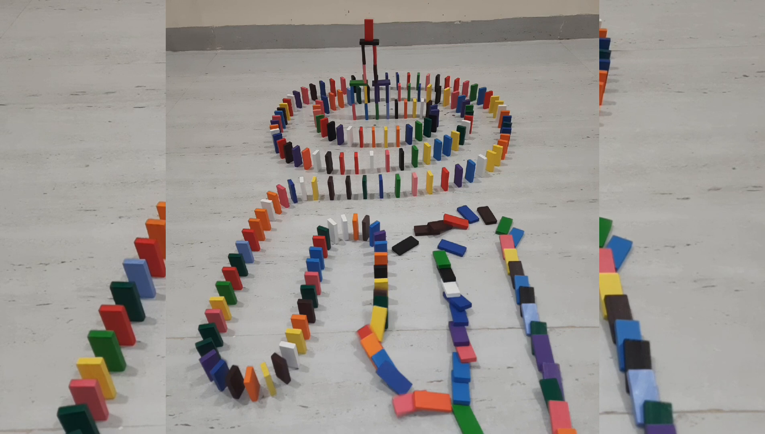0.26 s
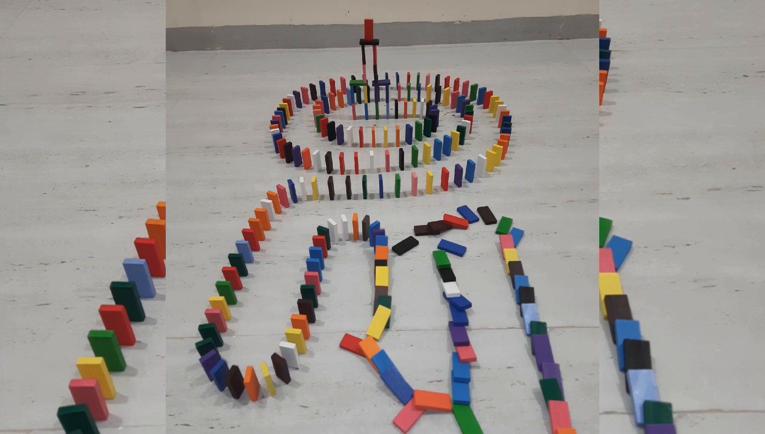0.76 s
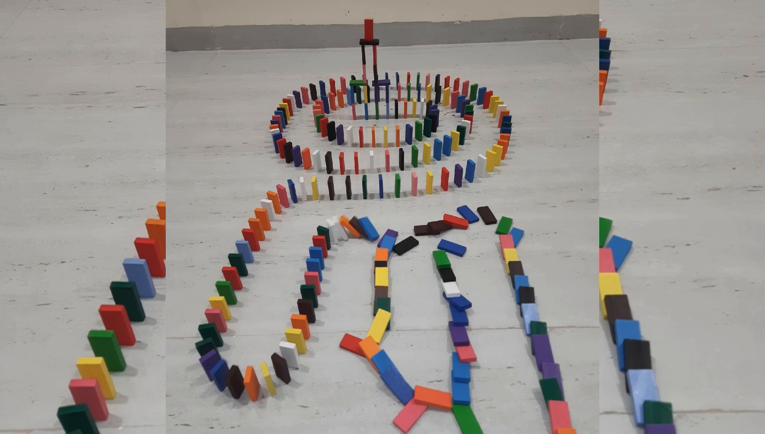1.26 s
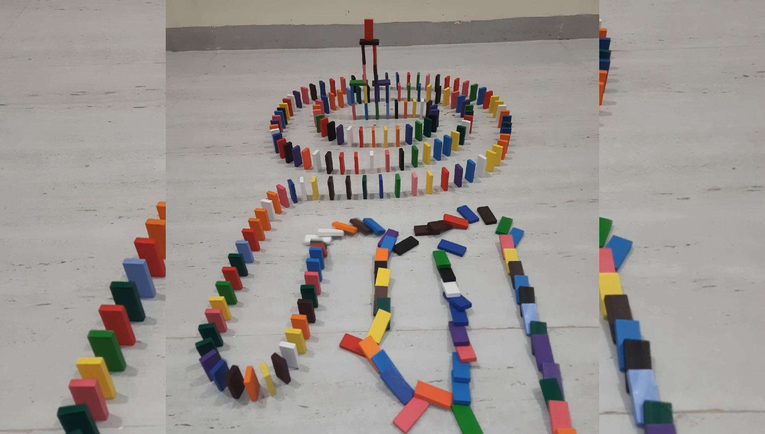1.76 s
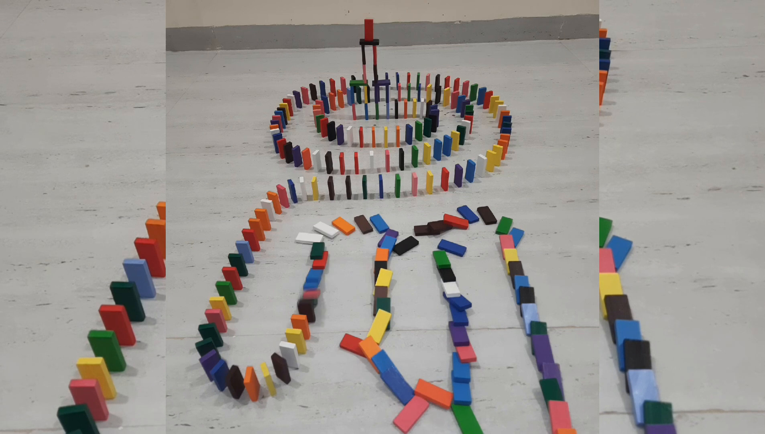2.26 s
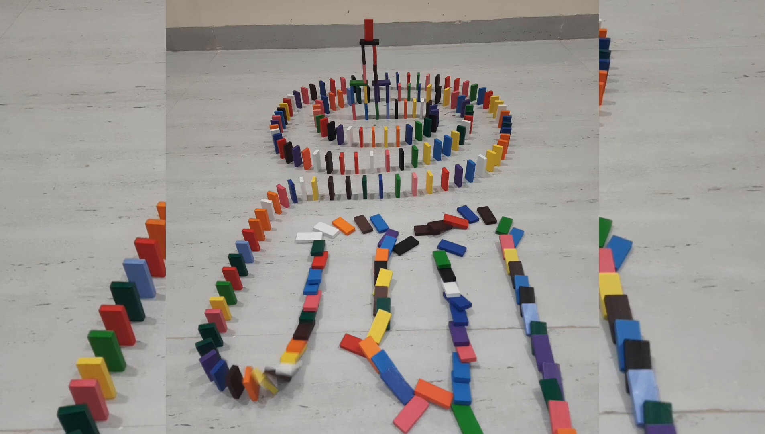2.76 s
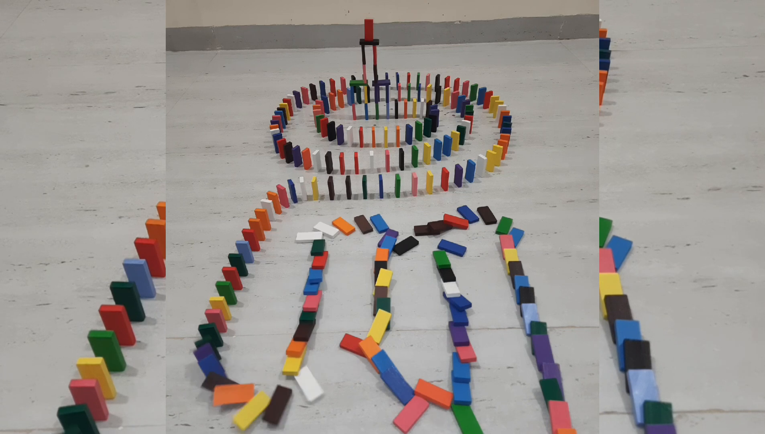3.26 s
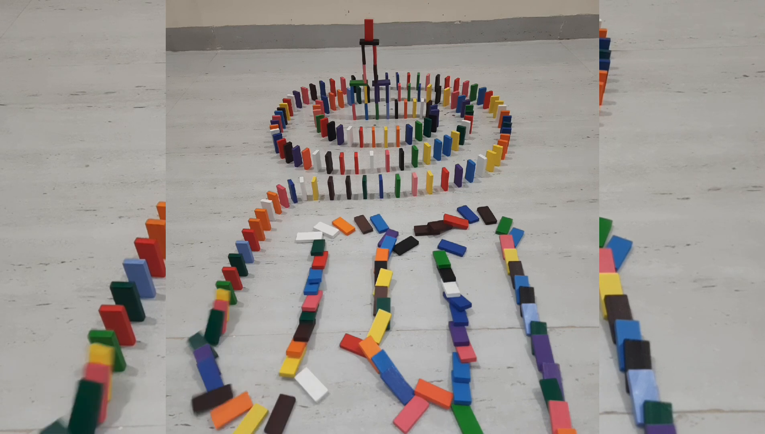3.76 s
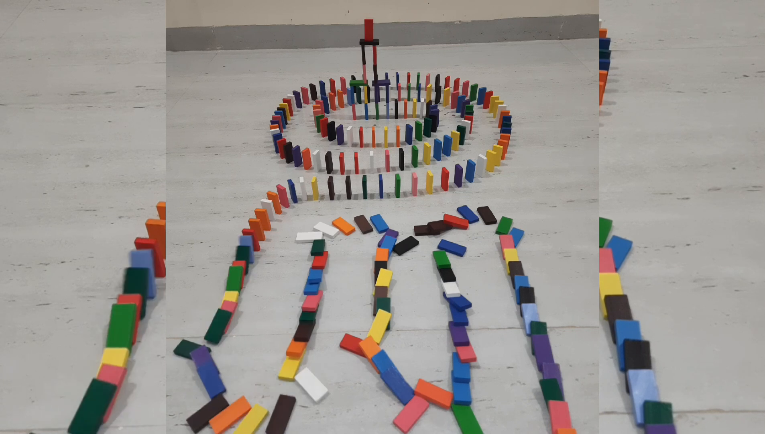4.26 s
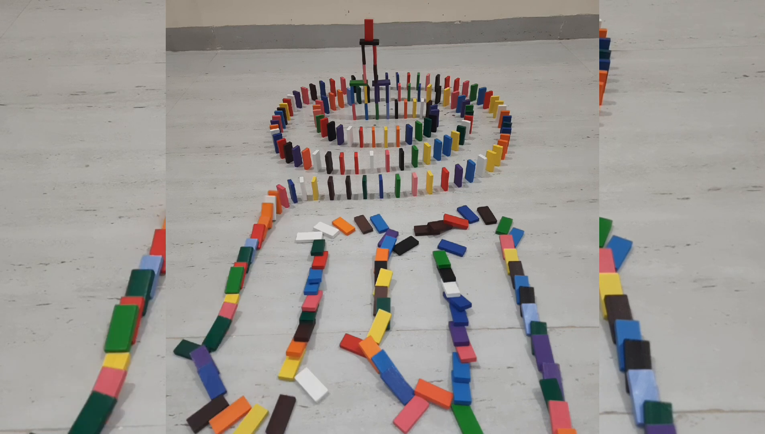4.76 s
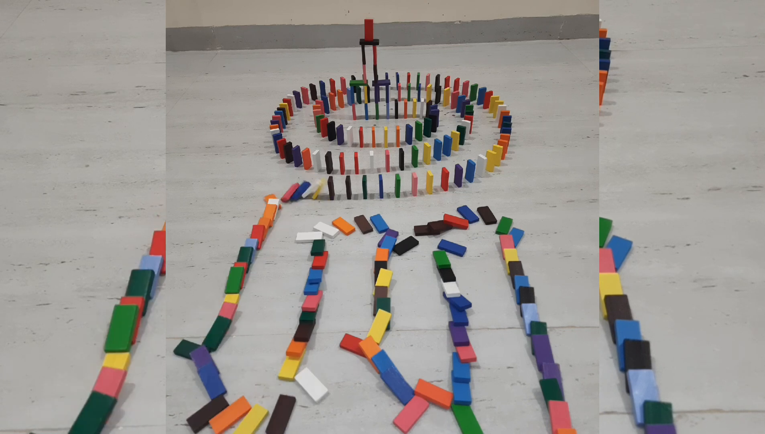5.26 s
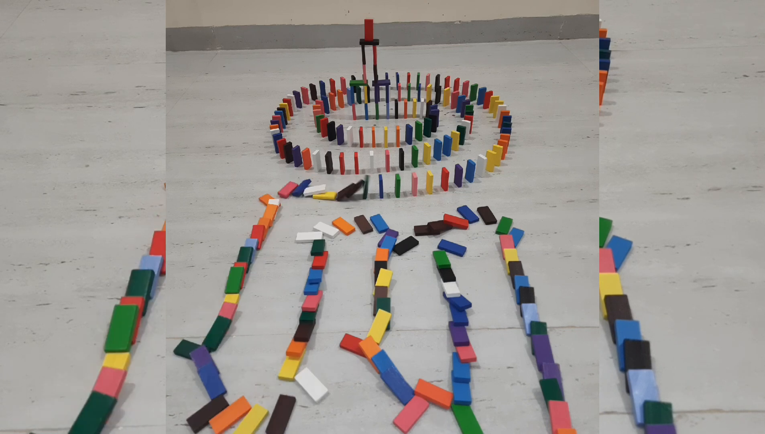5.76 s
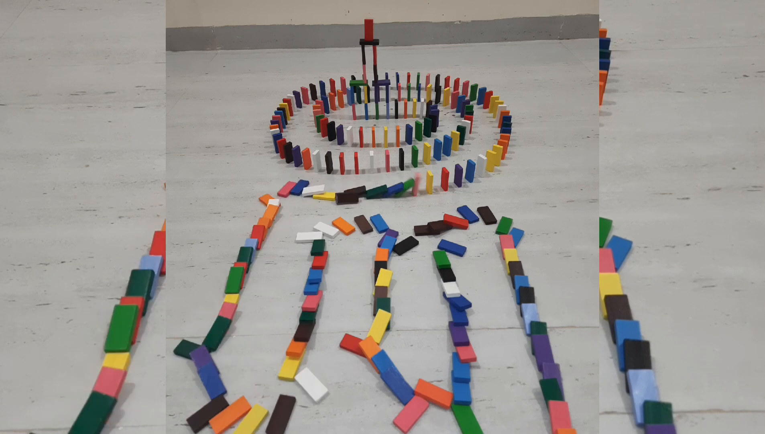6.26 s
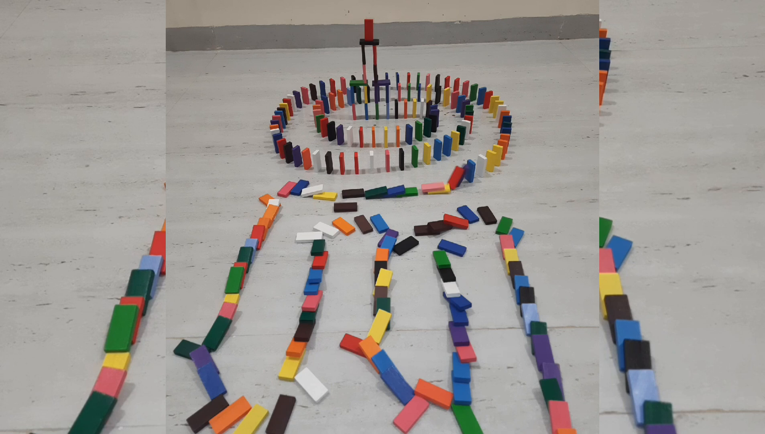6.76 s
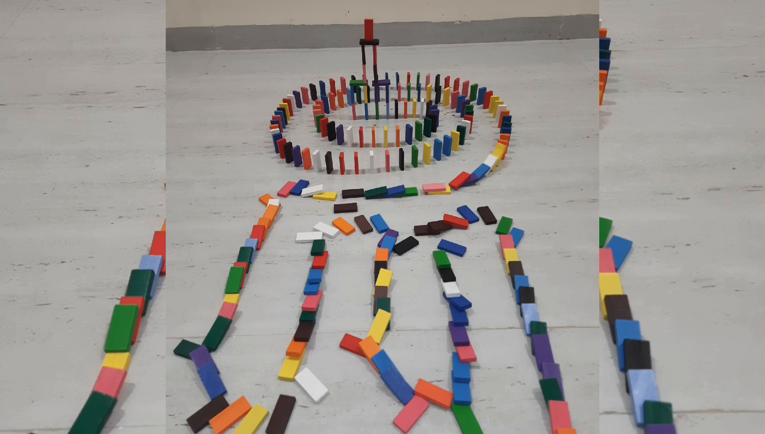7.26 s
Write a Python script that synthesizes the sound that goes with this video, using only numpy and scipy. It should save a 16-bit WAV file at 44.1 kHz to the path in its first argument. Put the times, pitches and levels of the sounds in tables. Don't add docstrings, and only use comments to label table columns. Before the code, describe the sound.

A long chain of small wooden dominoes topples in slow motion on a stone floor. Hollow face slaps mix with sharp edge clicks and dense light ticking. It clatters in uneven bursts, swells to hard clacks near four seconds, then eases into lighter knocks as the chain runs on. Close stereo microphones in a bare room with long echo; the slowing leaves a gritty, metallic edge on top.

```python
import sys
import numpy as np
from scipy import signal
from scipy.fft import rfft, irfft, next_fast_len
from scipy.io import wavfile
from scipy.ndimage import uniform_filter1d, minimum_filter1d, map_coordinates

SR = 44100
rng = np.random.default_rng(int(sys.argv[2]) if len(sys.argv) > 2 else 0)


def log_audio(samples):
    frames = np.atleast_2d(samples).T
    limited = np.clip(frames, -1, 1)
    pcm = np.round(limited * 32767).astype(np.int16)
    wavfile.write(sys.argv[1], SR, pcm)


def gain_from_db(level_db):
    decades = np.asarray(level_db, float) / 20
    return 10 ** decades


N = 329868
SLOW_RATE = 12000

# f/Hz, level/dB
THUD_SPECTRUM = [(100, -26.5), (170, -18), (330, -9.5), (660, -2.5), (1250, 1.5), (1600, -4), (2000, -19),
                 (5000, -68)]
# f/Hz, level/dB
CLACK_SPECTRUM = [(1000, -31), (1600, 7.5), (2000, 14), (2200, 10), (2450, -0.5), (3000, -12.5)]
# f/Hz, level/dB
RING_SPECTRUM = [(1800, -16.5), (2450, -42), (2800, 13), (3500, 7), (4200, -2), (4750, 8), (5000, 11.5)]
# t/s, level/dB
FLOOR_BLOWS = [
    (1.609, -37),
    (3.932, -18),
    (4.333, -30),
]
# t/s, left over right level/dB
FRONT_SIDE = [(.2, 4.5), (.7, -9.5), (1.2, 7.5), (1.9, 6.5), (2.7, 7.5), (3.5, -1.5), (4.2, 7), (5.2, 7),
              (6.4, 10.5)]


def face_slaps():
    # t/s, peak level/dB, low ring f/Hz
    slaps = [(0.0628, -39, 1900), (0.2278, -26, 2100), (0.3525, -25, 1010), (0.5938, -29, 1950),
             (0.6762, -21.5, 820), (0.6878, -46.5, 1000), (0.7083, -26, 1300), (0.7128, -52, 1220),
             (0.757, -24, 1580), (0.7825, -30.5, 1390), (0.7933, -29, 1270), (0.7974, -39, 1400),
             (0.8022, -54, 1300), (0.8213, -20.5, 1460), (0.8897, -22.5, 900), (0.8987, -14, 1400),
             (0.9068, -24, 1310), (0.9105, -15, 1640), (0.9145, -26, 1000), (0.9198, -35, 1030),
             (0.9268, -17, 1340), (0.9328, -30, 1320), (1.0309, -14, 1200), (1.0453, -17.5, 1420),
             (1.0512, -35, 1170), (1.0554, -22, 1200), (1.1319, -37, 1280), (1.1368, -16, 1380),
             (1.1451, -28.5, 1320), (1.1521, -19, 1300), (1.1655, -21, 1320), (1.1755, -33, 1270),
             (1.2441, -30.5, 1770), (1.2554, -24, 1650), (1.2704, -35.5, 1620), (1.3198, -26, 1300),
             (1.3312, -25.5, 1200), (1.3473, -31, 1270), (1.4039, -46, 900), (1.5318, -21.5, 1400),
             (1.5349, -18.5, 2140), (1.5564, -30.5, 1050), (1.6112, -20, 1500), (1.6149, -17, 2237),
             (1.6599, -24, 1350), (2.0327, -26.5, 1260), (2.0556, -29.5, 820), (2.1332, -28.5, 890),
             (2.1655, -22, 1190), (2.1741, -38, 1020), (2.2184, -20.5, 1970), (2.229, -18.5, 1140),
             (2.2403, -34.5, 1800), (2.2606, -27, 1180), (2.2656, -28.5, 1150), (2.2934, -43.5, 1030),
             (2.3443, -26, 1930), (2.3887, -23.5, 1900), (2.4157, -29.5, 2230), (2.4201, -24, 2510),
             (2.4693, -29, 2000), (2.4901, -27, 1914), (2.5524, -33, 1990), (2.6007, -28.5, 1410),
                    (2.6391, -23.5, 970), (2.6477, -30.5, 1840), (2.663, -23.5, 2010), (2.6878, -27, 1830),
                    (2.7579, -22.5, 1380), (2.8493, -34, 1890), (2.861, -18.5, 910), (2.8738, -27.5, 2200),
                    (2.8801, -22.5, 1400), (2.9795, -24, 1300), (3.1298, -20, 1930), (3.202, -25, 1550),
                    (3.2097, -22.5, 990), (3.2542, -34, 1250), (3.2699, -24.5, 950), (3.3064, -23, 1010),
                    (4.401, -18, 1880), (4.363, -21, 1884), (4.389, -21, 1980), (3.5607, -26.5, 1290),
                    (4.431, -26, 1990), (3.5868, -24.5, 820), (3.6207, -16, 1180), (3.6543, -30, 1590),
                    (3.6707, -21.5, 2180), (3.6755, -17.5, 1930), (3.6809, -22, 2170), (3.685, -9.5, 1410),
                    (3.6938, -16, 1301), (3.9028, -19.5, 1290), (3.93, -33, 2180), (3.9357, -7.5, 2130),
                    (3.966, -25, 1280), (3.9753, -18, 1170), (3.979, -19, 1520), (4.0562, -22, 1390),
                    (4.459, -15, 2040), (4.0857, -22, 1230), (4.094, -19, 1190), (4.1444, -29, 1350),
                    (4.152, -18, 1127), (4.17, -25, 1870), (4.1955, -25, 2210), (4.2085, -21.5, 1690),
                    (4.2376, -25.5, 1370), (4.2552, -31, 1940), (4.2668, -16.5, 1260), (4.2755, -25, 1180),
                    (4.2992, -17.5, 2030), (4.3132, -20, 1960), (4.332, -13.5, 1960), (4.3384, -15, 1966),
                    (4.4453, -18.5, 1996), (4.5173, -26, 2020), (4.5223, -13.5, 1460), (4.5277, -22, 1820),
             (4.5317, -15, 2080), (4.541, -19, 1550), (4.6564, -17, 1380), (4.6633, -18.5, 1180),
                  (4.8054, -18.5, 1450), (4.828, -35, 1108), (4.922, -25, 710), (4.9304, -36, 1500),
                  (5.0303, -32, 1520), (5.0453, -18.5, 1230), (5.1591, -29, 1260), (5.166, -41, 1220),
                  (5.226, -29, 1155), (5.2377, -19.5, 1263), (5.2533, -34, 1410), (5.3056, -33, 620),
                  (5.3486, -30.5, 1530), (5.3576, -31, 1420), (5.5109, -31, 2210), (5.524, -31, 1510),
                  (5.5546, -30.5, 2250), (5.6351, -33, 855), (5.6908, -40, 1170), (5.7195, -41.5, 1260),
                  (5.822, -29.5, 1880), (5.8281, -34, 2010), (5.8498, -24.5, 1040), (5.8687, -29, 1870),
                  (5.877, -25.5, 1320), (5.918, -23, 1210), (5.9705, -30, 1900), (6.0141, -25, 2250),
                  (6.1139, -30, 1200), (6.145, -31, 1830), (6.1605, -27, 2250), (6.2149, -30, 1890),
                  (6.3073, -27.5, 1180), (6.3632, -32, 1130), (6.3667, -28.5, 1220), (6.374, -24, 2090),
                  (6.3883, -34, 1240), (6.5672, -27, 1350), (6.5727, -39.5, 1190), (6.5804, -42, 1200),
                  (6.6617, -26.5, 1320), (6.6792, -21.5, 2090), (6.6955, -23, 2400), (6.7088, -35, 1200),
                  (6.7184, -32.5, 1210), (6.7244, -24.5, 1286), (6.426, -29.5, 1523), (6.961, -33.5, 1270),
                  (7.03, -28.5, 1770), (7.1311, -28, 1900), (7.14, -28, 1130), (7.144, -25, 2140),
                  (7.2883, -31.5, 1810), (7.3091, -47.5, 2110), (7.318, -31, 1010), (7.3614, -50.5, 2090)]
    # f/Hz, level/dB
    slap_spectrum = [(150, -18), (450, -4), (1200, 0), (2200, -1), (2700, -6), (4300, -28)]
    return knocks(slaps, slap_spectrum, .018, .007,
                  ring_db=0, top_db=-40, focus=2.2, stiff=1.2)


def edge_clicks():
    # t/s, peak level/dB, high ring f/Hz
    clicks = [(0.0199, -17, 3450), (0.0872, -26, 3370), (0.214, -35, 3000), (0.3462, -30, 3210),
              (0.3575, -53, 3130), (0.4085, -35, 3150), (0.5958, -30, 2700), (0.6048, -40.5, 2950),
              (0.6773, -27.5, 3010), (0.688, -44, 2960), (0.8725, -31.5, 4730), (0.7855, -35.5, 2900),
              (0.7909, -43, 3000), (0.7979, -33, 3520), (0.8225, -29.5, 2930), (0.8278, -25, 2750),
              (0.8898, -34, 3240), (0.8988, -33, 3650), (0.9113, -37, 3080), (0.9287, -33.5, 2860),
              (0.9335, -27.5, 3180), (0.9722, -30, 3306), (1.0308, -44.5, 2910), (1.0567, -30, 3450),
              (1.1319, -36, 3270), (1.1385, -28.5, 3000), (1.1527, -32, 3100), (1.1666, -30.5, 3070),
              (1.2442, -37.5, 3490), (1.2578, -30.5, 3060), (1.273, -26, 3080), (1.5358, -23, 5040),
              (1.5598, -28, 2750), (1.6107, -17.5, 3310), (1.6738, -27, 4060), (1.6858, -29, 3070),
              (1.6928, -27, 2970), (1.7405, -34.5, 2660), (1.7669, -31, 2880), (1.8368, -33, 2740),
              (1.8826, -42, 2760), (2.021, -38, 3120), (2.0331, -35, 2730), (2.057, -37, 2830),
              (2.0641, -35, 2830), (2.1351, -32, 3030), (1.0432, -47.5, 4980), (2.218, -30.5, 3550),
              (2.2282, -31, 2880), (2.2617, -31, 4460), (2.3213, -31.5, 2640), (2.3444, -31.5, 3680),
              (2.3888, -22.5, 3230), (2.414, -18, 4750), (2.4209, -24, 4100), (2.4304, -45, 4470),
              (2.4346, -21.5, 4100), (2.4449, -29, 2870), (2.4787, -22, 2820), (2.4836, -26, 4920),
              (2.486, -26.5, 3060), (2.5294, -31, 3410), (2.534, -22.5, 3320), (2.5993, -38, 2880),
                     (2.646, -27, 2850), (2.6642, -19, 3580), (2.684, -24, 2740), (2.716, -27, 2750),
                     (2.7595, -31.5, 3510), (2.766, -53.5, 3230), (2.8317, -39, 2760), (2.852, -30.5, 2970),
                     (2.8742, -23, 2920), (2.9086, -39, 2750), (3.028, -49, 2900), (3.1396, -24.5, 3232),
                     (3.2044, -31, 3140), (3.2099, -26, 3276), (3.2553, -36.5, 3120), (3.3063, -32.5, 3280),
                     (3.471, -35.5, 2670), (3.5317, -38, 2560), (3.5616, -45.5, 3240), (3.5887, -31, 2800),
                     (3.6207, -53, 3100), (3.6722, -21, 3330), (3.6797, -28, 2600), (3.684, -29, 3100),
                     (3.6952, -19.5, 2790), (3.7038, -30, 2770), (3.728, -43, 2780), (3.7347, -23, 2660),
                     (3.9036, -47, 2770), (3.9291, -18, 3250), (3.9351, -8, 4940), (3.9393, -12, 3260),
                     (3.983, -23.5, 2730), (4.0048, -25.5, 3250), (4.011, -23, 3060), (4.0784, -31, 3200),
                     (4.1476, -26, 2950), (4.1728, -30.5, 4940), (4.193, -19.5, 4810), (4.2532, -33, 2780),
                     (4.277, -27, 3060), (4.2985, -16, 3750), (4.3297, -22.5, 3020), (4.337, -19.5, 3810),
                     (4.3706, -26.5, 3840), (4.4127, -26, 3170), (4.4444, -14.5, 4310), (4.46, -33.5, 2990),
                     (4.5177, -33, 3300), (4.5227, -27, 3010), (4.5294, -22.5, 3090), (4.5486, -32, 2860),
                     (4.5964, -28.5, 3220), (4.6185, -24.5, 3030), (4.634, -32, 3250), (4.657, -26.5, 2870),
              (4.7236, -35.5, 3080), (4.807, -35, 2970), (4.816, -51, 2910), (4.8665, -36, 2970),
                   (4.876, -45, 3050), (4.9317, -42, 3100), (5.047, -38, 3600), (5.3044, -52, 2910),
                   (5.4366, -41.5, 3550), (6.6466, -33, 4600), (5.5213, -36, 3010), (5.69, -30.5, 2990),
                   (6.514, -41, 4700), (5.7038, -45, 2990), (5.7487, -42, 2940), (5.757, -42.5, 2960),
                   (5.8226, -26, 3050), (5.8245, -41, 3050), (5.8516, -36, 2960), (5.8653, -29.5, 3570),
                   (5.8957, -33.5, 3040), (5.9192, -39, 2990), (5.9703, -24.5, 3590), (5.9738, -47, 3590),
                   (5.9987, -37, 3590), (6.0061, -30, 4710), (6.0157, -39, 3600), (6.028, -34, 3610),
                   (6.1445, -26.5, 3590), (6.1602, -18, 3600), (6.31, -28, 3000), (6.3307, -45, 2900),
                   (6.361, -30.5, 3600), (6.37, -31, 3010), (6.3753, -22, 3600), (6.5357, -31, 4570),
                   (6.5461, -33, 4444), (6.605, -28, 3170), (6.6664, -29, 2850), (6.677, -26, 2820),
                   (6.682, -27.5, 2860), (6.8214, -35, 2830), (6.8384, -28, 2850), (6.8685, -40, 2850),
                   (6.9927, -22.5, 3190), (7.0236, -29.5, 3670), (7.028, -34.5, 3140), (7.0445, -28, 3210),
                   (7.058, -31.5, 3190), (7.0613, -31, 3180), (7.0792, -22, 3190), (7.1291, -23, 3130),
                   (7.1417, -28, 3360), (7.1468, -28.5, 3330), (7.1993, -43, 3180), (7.207, -25.5, 2890),
                   (7.2203, -31, 2870), (7.2905, -31, 3260), (7.3088, -31.5, 3360), (7.319, -46, 3110)]
    # f/Hz, level/dB
    snap_spectrum = [(2000, -23), (2600, -2), (3500, 2), (4200, -2.5), (4750, -1.5), (5200, -15.5),
                     (6000, -19.5)]
    return knocks(clicks, snap_spectrum, .028, .006,
                  ring_db=-6, top_db=-14, focus=2.5, stiff=0)


def knocks(rows, spectrum, ring_t60, slap_t60, ring_db, top_db, focus, stiff):
    stiff_hz, thin_hz = 2000, 1200
    shared_mode_hz = 4730
    lead = 200
    s, db, ring_hz = np.transpose(rows)
    t = np.arange(1200) / SR
    draw = rng.standard_normal((len(s), 3)).T
    pan = np.interp(s, *np.transpose(FRONT_SIDE)) + 1.5 * draw[0]

    stiffness = (ring_hz / stiff_hz) ** stiff
    t60 = ring_t60 * stiffness * np.exp(.15 * draw[1])
    ring = ringing(ring_hz, t60[:, None], t, .0004)
    top = ringing(shared_mode_hz + 0 * s, .025, t, .0004)
    ring += gain_from_db(top_db + 3 * draw[2])[:, None] * top

    burst = gain_from_db(-60 * t / slap_t60) * rng.standard_normal((len(s), len(t)))
    burst[:, 0] = 5
    hz = np.fft.rfftfreq(len(t), 1 / SR)
    below = np.log2(ring_hz[:, None] / (hz + 1))
    slope = focus * np.where(below > 0, (ring_hz[:, None] / thin_hz) ** 2, 1)
    rattle = irfft(rfft(burst) * gain_from_db(along(spectrum, hz) - slope * np.abs(below)), len(t))
    rattle /= np.abs(rattle).max(axis=1, keepdims=True)

    blow = gain_from_db(ring_db) * stiffness[:, None] * ring + rattle
    blow = np.roll(blow, lead, axis=1)
    blow *= gain_from_db(db)[:, None] / np.abs(blow).max(axis=1, keepdims=True)
    crest = uniform_filter1d(blow ** 2, size=50, axis=1).argmax(axis=1)
    return placed(s - crest / SR, np.array([blow, blow]), pan)


def ringing(hz, t60, t, attack):
    return np.sin(2 * np.pi * hz[:, None] * t) * gain_from_db(-60 * t / t60) * (1 - np.exp(-t / attack))


def placed(s, shapes, pan_db):
    # t/s, lag/samples
    left_lag = [(.2, 31), (.8, 15), (1.2, 6), (2.7, -3), (3.3, 21), (4.2, 23), (4.8, 0), (5.2, -10),
                (7.4, -9)]
    lag = np.interp(s, *np.transpose(left_lag)) / 2
    out = []
    for side, shape in zip((1, -1), shapes):
        start = np.round(s * SR + side * lag).astype(int)
        at = start[:, None] + np.arange(shapes.shape[-1])
        sized = shape * gain_from_db(side * pan_db / 2)[:, None]
        out.append(np.bincount(np.clip(at, 0, N).ravel(), sized.ravel(), N + 1)[:N])
    return np.array(out)


def clatter(per_second=220):
    draw = rng.random((int(per_second * N / SR), 4))
    s = draw[:, 0] * N / SR
    t = np.arange(500) / SR
    burst = gain_from_db(-60 * t / (0.003 + 0.0099 * draw[:, 1:2])) * rng.standard_normal((len(draw), len(t)))
    burst *= gain_from_db(-2.5 * np.log(draw[:, 2] + 0.08))[:, None]
    pan = np.interp(s, *np.transpose(FRONT_SIDE)) / 2 + 6 * (draw[:, 3] - .5)
    ticks = placed(s, np.array([burst, burst]), pan)

    thud_db, clack_db, ring_db = front()
    thud = gain_from_db(thud_db - 4.0) * unit(coloured(ticks, THUD_SPECTRUM))
    clack = gain_from_db(clack_db - 8) * unit(singing(coloured(ticks, CLACK_SPECTRUM), 120, 2))
    ring = gain_from_db(ring_db - 5.5) * unit(singing(coloured(ticks, RING_SPECTRUM), 110, 1.3))
    return thud + clack + ring


def front():
    # t/s, strength level/dB, block-on-block level/dB, edge-on level/dB
    falling_front = [(0.0, -44, 8.5, 10.5), (0.5, -46, -5, 4), (0.69, -48, -20.5, -2.5),
                     (0.83, -42.5, 2.5, 2), (1.1, -42, 0, 7), (1.85, -48, 6.5, -0.5), (2.1, -49, 5.5, -3.5),
                     (2.39, -41, 5, 4.5), (2.73, -41, 10, 10.5), (3.4, -45, -6, -2.5),
                     (3.6, -44.5, -18, -3.5), (3.79, -40.5, -15.5, -0.5), (4.44, -39.5, 12, 9.5),
                     (5.65, -47.5, -1, -3.5), (5.89, -47.5, 8, 5.5), (6.04, -42.5, 6, 2.5),
                     (6.85, -42.5, 9, 7), (7.48, -45, 11.5, 3)]
    strength_db, block_db, edge_db = curves(falling_front)
    return strength_db, strength_db - 7 + block_db, strength_db - 6.5 + edge_db


def singing(x, width_hz, lift_db):
    # f/Hz, level/dB
    block_modes = [(1250, 8), (2000, -1.5), (2170, -2), (2790, 0), (3030, 5), (3230, 7.5), (3580, -2),
                   (4150, 7), (4730, -22)]

    def response(f):
        total = 1
        for c, db in block_modes:
            damping = 1j * f * width_hz
            total = total + gain_from_db(db + lift_db) * damping / (c * c - f * f + damping)
        return total
    return filtered(x, response)


def thumps():
    s, db = np.transpose(FLOOR_BLOWS)
    t = np.arange(SR // 6) / SR
    push = 0
    for hz, level, t60 in [(30, -18, 0.3), (75, -27, 0.13), (142, 1.5, 0.012)]:  # Hz, dB, s
        push = push + gain_from_db(level) * ringing(np.full(len(s), hz), t60, t, 0.00025)
    return placed(s, gain_from_db(db)[:, None] * np.array([push, -.6 * push]), 0 * s)


def walls(x):
    # f/Hz, t60/s
    near_decay = [(300, 0.064), (2000, 0.04), (5000, 0.055)]
    out, step = np.zeros((2, N + SR)), SR // 3
    delay = 90
    for at in range(0, N, step):
        tail = decaying(near_decay, SR // 4, 128)
        wet = signal.fftconvolve(x[at:at + step][None], tail, axes=1)
        out[:, at + delay:at + delay + wet.shape[1]] += wet
    return out[:, :N]


def hall(x):
    # f/Hz, level/dB
    earlier_modes = [(1930, -17.5), (2180, -15.5), (3480, -14), (4730, -18)]
    # f/Hz, t60/s
    room_decay = [(500, 0.81), (2000, 1.94), (5000, 0.91)]
    mode_hz, mode_db = np.transpose(earlier_modes)
    before = gain_from_db(mode_db) @ ringing(mode_hz, 0.037, np.arange(SR // 10) / SR, 0.000082)
    heard = np.pad(x, (600, 0))[:N] + gain_from_db(-1) * np.pad(before, (0, N - len(before)))
    return signal.fftconvolve(heard[None], decaying(room_decay, SR, 256), axes=1)[:, :N]


def decaying(t60_points, length, window):
    hz, t, z = signal.stft(rng.standard_normal((2, length)), SR, nperseg=window)
    fade = gain_from_db(-60 * t / along(t60_points, hz)[:, None])
    tail = signal.istft(z * fade, SR, nperseg=window)[1]
    return tail / np.linalg.norm(tail[0])


def echo():
    # f/Hz, level/dB
    rumble_spectrum = [(12, -15), (28, 19), (60, -4), (120, -15), (200, -55)]
    recede_s = 7.4
    thud_db, clack_db, ring_db = front()
    thud = gain_from_db(thud_db - 0.5) * rush(THUD_SPECTRUM, 0.017, patchy_db=3.5) * gain_from_db([[.3], [-.3]])

    clack = rush(CLACK_SPECTRUM, 0.014, patchy_db=3.5)
    receded = filtered(clack, lambda f: 1 - 0.56 / (1 + ((f - 2000) / 250) ** 2))
    clack = np.where(np.arange(N) < recede_s * SR, unit(singing(clack, 40, 0)), unit(receded))
    clack = gain_from_db(clack_db) * clack * gain_from_db([[1.6], [-1.6]])

    ring = unit(singing(rush(RING_SPECTRUM, 0.031, patchy_db=2.5), 22, 0.23))
    ring = gain_from_db(ring_db + 9.0) * ring * gain_from_db([[.7], [-.7]])
    rumble = gain_from_db(10.0) * shaking() * rush(rumble_spectrum, 0.17, patchy_db=1.5) * [[1], [-1]]
    return thud + clack + ring + rumble


def rush(spectrum, alike, patchy_db):
    z = signal.stft(rng.standard_normal((3, N)), nperseg=512)[2]
    field = uniform_filter1d(rng.standard_normal(z.shape[1:]), size=3, axis=0)
    field = uniform_filter1d(field, size=6, axis=1)
    both, *own = signal.istft(z * gain_from_db(patchy_db * unit(field)), nperseg=512)[1][:, :N]
    mixed = np.sqrt(alike) * both + np.sqrt(1 - alike) * np.array(own)
    return unit(coloured(mixed, spectrum))


def shaking():
    t = np.arange(N) / SR
    level = gain_from_db(-85) + gain_from_db(-60 - 60 * t / 0.5)
    for s, db in FLOOR_BLOWS:
        level = level + (t >= s) * gain_from_db(db - 39 - 60 * np.abs(t - s) / 1.0)
    return level


def unit(x):
    return x / np.sqrt(np.mean(x ** 2) + 1e-20)


def along(points, hz):
    f, v = np.transpose(points)
    return np.interp(np.log(hz + 1), np.log(f + 1), v)


def curves(rows):
    s, *cols = np.transpose(rows)
    return [np.interp(np.arange(N) / SR, s, c) for c in cols]


def filtered(x, response):
    m = next_fast_len(N + SR // 2)
    return irfft(rfft(x, m) * response(np.fft.rfftfreq(m, 1 / SR)), m)[..., :N]


def coloured(x, spectrum):
    return filtered(x, lambda hz: gain_from_db(along(spectrum, hz)))


def limited(x, top=.8):
    need = np.minimum(1, top / (np.abs(x).max(axis=0) + 1e-9))
    return x * uniform_filter1d(minimum_filter1d(need, size=177), size=89)


def scene():
    edge_hz = 5000
    faces, edges, light = face_slaps(), edge_clicks(), clatter()
    blows = gain_from_db(2.2) * faces + gain_from_db(3) * edges
    to_room = limited(gain_from_db(2.0) * faces + gain_from_db(5) * edges, .12).mean(axis=0)
    bed = light + echo() + gain_from_db(-0.5) * hall(to_room) + gain_from_db(-2.5) * walls((blows + light).mean(axis=0))

    def blow_band(hz):
        above = gain_from_db(-1.0 - (hz - edge_hz) / 40) * (hz < SLOW_RATE / 2)
        return np.where(hz < edge_hz, 1, above) / (1 + (300 / (hz + 1)) ** 3)
    return filtered(blows, blow_band) + filtered(bed, lambda hz: hz < edge_hz) + thumps()


def thinned(x):
    # f/Hz, level below the loudness/dB
    faintest = [(4900, -71), (5250, -41), (6700, -34), (7100, -50), (10200, -46), (10800, -40),
                (11300, -27), (12700, -30), (13200, -46), (13900, -50), (15300, -48), (15600, -33),
                (16200, -14)]
    hz, _, z = signal.stft(x, SR, nperseg=1024)
    power = np.abs(z) ** 2
    band = uniform_filter1d(power, size=9, axis=1)
    loud = uniform_filter1d(power.sum(axis=1, keepdims=True), size=25, axis=2) / 100
    floor = loud * gain_from_db(2 * along(faintest, hz))[:, None]
    keep = np.clip(4 * (band / floor - 1), 0, 1)
    return signal.istft(z * keep, SR, nperseg=1024)[1][:, :N]


def band_limit(x):
    return signal.sosfilt(signal.butter(12, 16510, fs=SR, output="sos"), x)


def record(dry):
    kept = np.arange(0, N, SR / SLOW_RATE)
    sparse = [map_coordinates(ch, [kept]) for ch in limited(dry)]
    lines = np.array([np.interp(np.arange(N), kept, ch) for ch in sparse])
    mix = filtered(thinned(gain_from_db(0.5) * lines), lambda hz: hz < 16300)
    return band_limit(mix)


dry = scene()
out = record(dry)
log_audio(out)
```